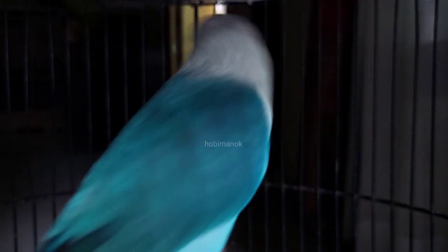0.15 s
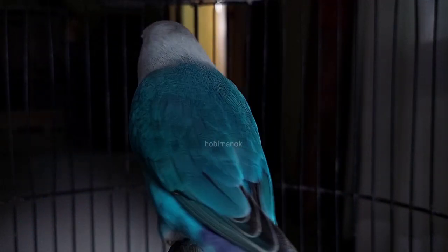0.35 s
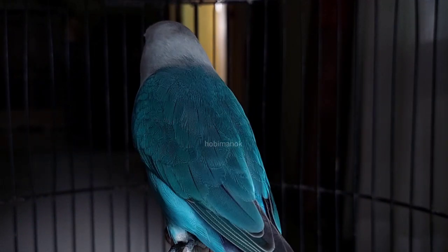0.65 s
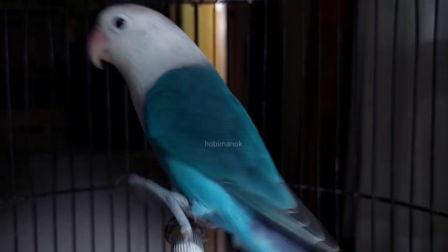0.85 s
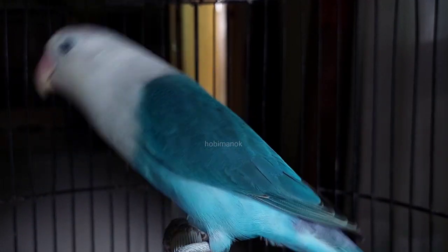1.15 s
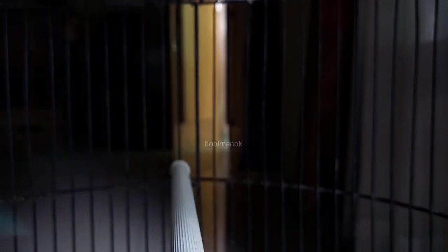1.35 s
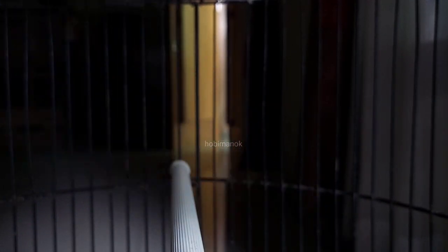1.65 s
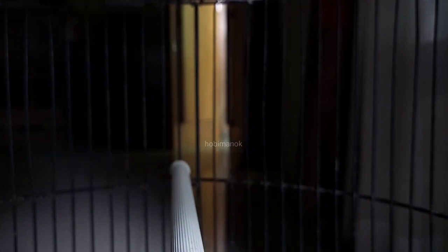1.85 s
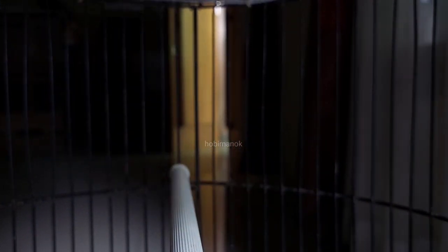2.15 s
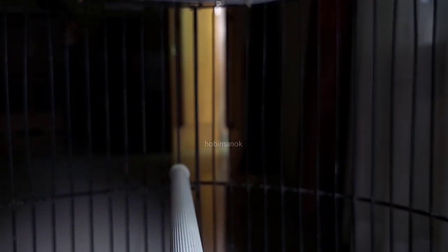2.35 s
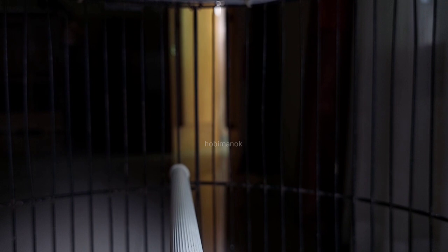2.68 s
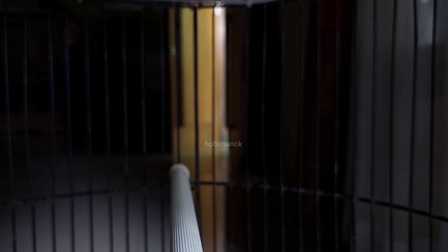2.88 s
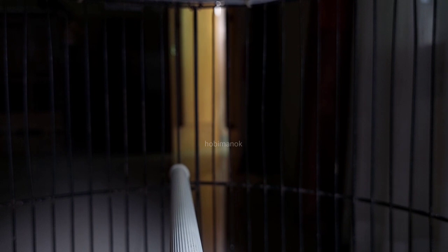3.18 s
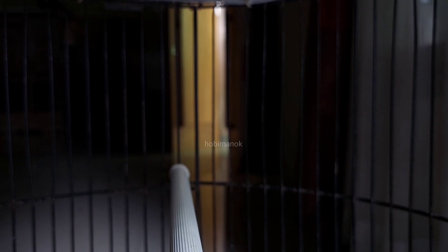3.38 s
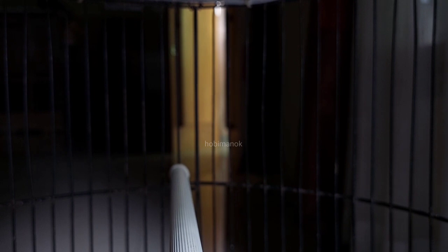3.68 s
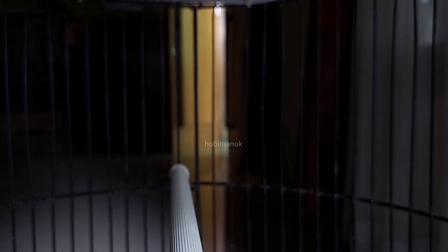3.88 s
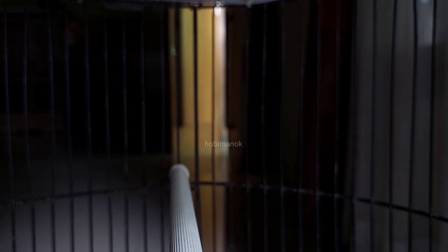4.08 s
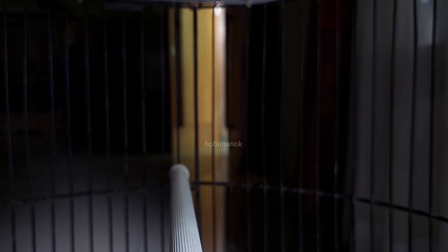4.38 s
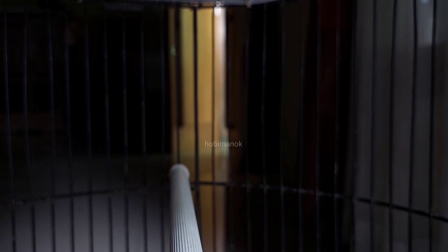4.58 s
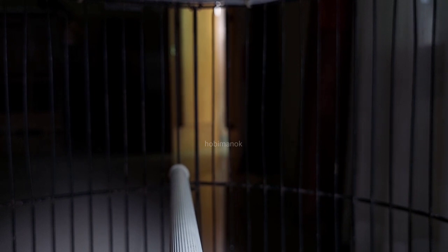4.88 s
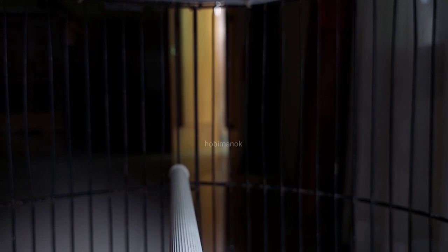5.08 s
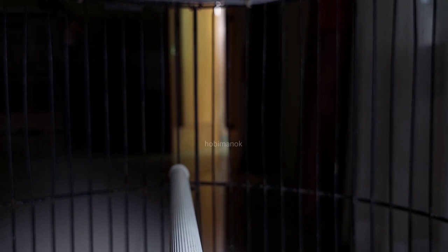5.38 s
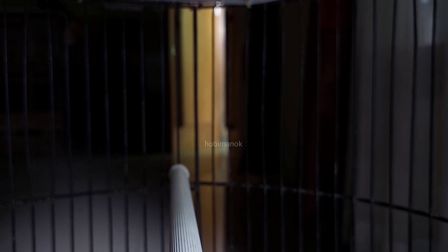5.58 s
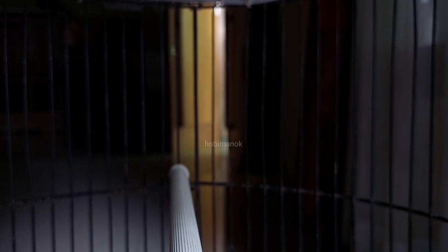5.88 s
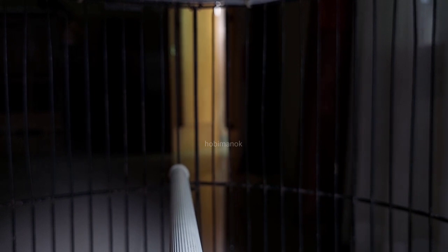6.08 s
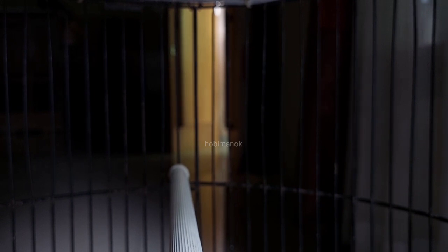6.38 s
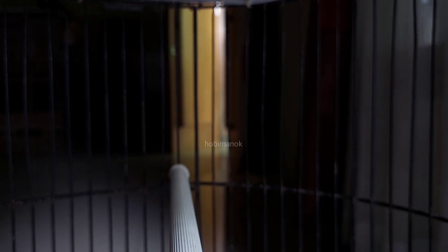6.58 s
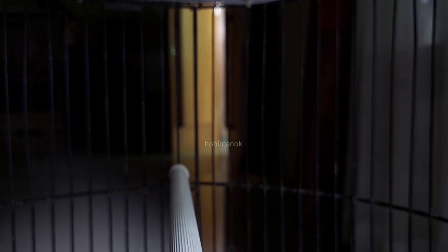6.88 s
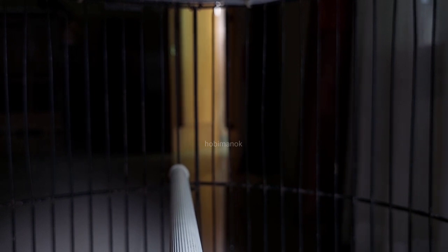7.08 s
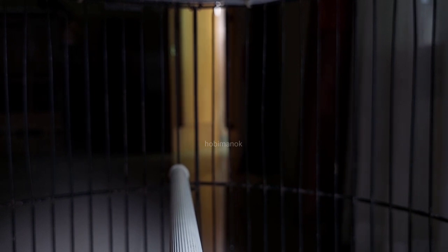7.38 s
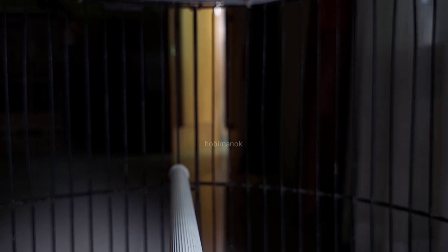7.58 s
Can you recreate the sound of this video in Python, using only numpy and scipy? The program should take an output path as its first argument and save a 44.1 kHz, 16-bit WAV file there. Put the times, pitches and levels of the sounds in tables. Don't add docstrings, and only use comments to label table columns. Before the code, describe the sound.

A small parrot very close to the microphone, mostly on the left, gives about a dozen short squeaky chirps. It pauses, wings flutter briefly, and one harsh chip sounds around two and a half seconds. Distant birds whistle and chip with hard yard echoes and claws tick the cage wires. From four and a half seconds it chatters loudly, about ten notes a second, through to the end, with breath puffs hitting the microphone and faint street rumble below.

```python
import sys
import numpy as np
from scipy import signal
from scipy.fft import rfft, irfft, next_fast_len
from scipy.io import wavfile
from scipy.ndimage import uniform_filter1d, map_coordinates

SR = 44100
rng = np.random.default_rng(int(sys.argv[2]) if len(sys.argv) > 2 else 0)


def how_loud(loudness_db):
    steps = np.asarray(loudness_db, float) / 20
    return 10 ** steps


def to_wav(sig):
    pcm = np.clip(np.atleast_2d(sig), -1, 1) * 32767
    pcm = np.round(pcm).astype(np.int16)
    wavfile.write(sys.argv[1], SR, pcm.T)


N = 341334

# t/s, street level/dB, flock level/dB
AIR = [(0, -64, -43), (1.3, -63, -39.5), (1.5, -51.5, -40), (1.8, -69, -56), (2.15, -55, -65.5),
       (2.431, -57.5, -45.5), (2.62, -58, -60), (2.7, -81, -60), (3.049, -80, -47.5), (3.401, -75, -46.5),
       (3.683, -77, -60), (3.692, -67, -48), (3.95, -66, -75), (4.41, -55.5, -76.5), (4.6, -66, -53.5),
       (7.74, -62, -51)]
# f/Hz, level/dB per Hz
RUMBLE = [(20, -47), (60, 7.5), (120, 6.5), (300, -28.5)]
FLOCK = [(1600, -46.5), (2340, -1.5), (4600, 2), (7600, -11), (12300, -8.5), (13800, -53)]
RUSTLE_EARLY = [(120, -9), (250, -4), (307, -0.5), (400, -6.5), (700, -4.5), (1000, -12.5), (1800, -16),
                (3200, -35.5)]
RUSTLE_LATE = [(200, -3.5), (415, 0), (635, 1.5), (950, -5), (1720, -7.5), (2100, -19.5), (2540, -7.5),
               (3200, -27.5)]
TRAY = [(200, -46), (285, -10), (307, 0.5), (330, -1.5), (450, -46.5)]
INSECT = [(13200, -68.0), (13380, 5.5), (13480, 5.0), (13700, -59.5)]
# peak t/s, peak level/dB, rise/s, fall/(dB/s)
STIRS = [
    (1.5, -45.5, 0.054, 67),
    (2.438, -32.5, 0.021, 193),
    (2.583, -59, 0.069, 260),
    (2.65, -58, 0.031, 48),
    (3.695, -48.5, 0.0097, 37),
    (4.174, -51.5, 0.0034, 150),
    (4.199, -63.5, 0.034, 41),
    (4.32, -58, 0.11, 35),
    (4.43, -75, 0.1, 124),
]
LITTER_DB = -9.5
TRAY_DB, TRAY_FOLLOWS = -30, 0.58
CUT_S = 3.684

# t/s, peak level/dB
TICKS = [
    (3.686, -63),
    (3.7206, -61),
    (4.0293, -45),
    (4.111, -47),
]
# f/Hz, level/dB
WIRE = [(3000, -18), (12000, 6), (15000, -18)]

# f/Hz, t60/s
YARD_T60 = [(2500, 0.65), (5000, 0.48), (9000, 0.65), (13000, 0.51), (15000, 1)]
# t/s, length/s, start f/Hz, end f/Hz, level/dB
GLIDES = [(1.644, 0.11, 5680, 2710, -41.5), (1.7, 0.12, 5460, 2546, -40), (1.833, 0.19, 7410, 2670, -41.5),
          (1.938, .13, 4740, 2194, -43), (2.078, .05, 7700, 7130, -60), (2.138, 0.064, 5950, 4250, -50),
          (2.157, 0.075, 3420, 2320, -52.5), (2.317, 0.091, 5200, 2400, -48.5),
          (2.928, .085, 4280, 2280, -65), (3.112, .066, 5240, 3910, -41.5),
          (3.246, 0.169, 4780, 4796, -45.5), (3.876, 0.32, 2920, 4540, -61), (3.903, 0.17, 3210, 3620, -64),
          (4.172, 0.35, 2244, 4490, -53.5)]
GLIDE_LIFT_DB, RISING_DB = -24, 3
# t/s, f/Hz, level/dB, overtone lift/dB
CHIPS = [(2.17, 2542, -53, 36), (2.263, 2540, -50, 43), (2.354, 2420, -59, 7.5), (2.834, 2280, -41, 2),
         (2.915, 2280, -43, -3), (3.07, 5240, -48, -23.5), (3.072, 6080, -47, -33), (3.085, 3020, -44, -4),
         (3.332, 3135, -45, 6), (3.15, 5120, -38.5, 14), (3.7, 2540, -47, -25), (3.74, 2510, -49, -21),
         (4.03, 2890, -63, -6), (4.185, 1850, -62, -11), (4.302, 2500, -56.5, -25)]
CHIP_S, CHIP_SAG = 0.028, 0.97

# f/Hz, level/dB
REGISTER = [(1800, 4), (2500, 10), (3200, -2), (3550, -7), (3900, -9), (4300, -20), (4700, -20.5),
            (5200, -8)]
# f/Hz, level/dB
BEAK = [(7500, -12.5), (9000, -20.5), (11000, -12), (13000, -19), (15500, -28), (17000, -80.5)]
# f/Hz, level/dB
HISS = [(600, -26.5), (1800, -17), (3000, -6), (5000, -2.5), (9000, -3.5), (12000, -0.5), (15500, -43)]
# f/Hz, level/dB
CLICK = [(1200, -35), (2500, -1.5), (5000, 10), (9000, -8), (13000, -9.5), (16000, -29.5)]
# its f/Hz, level/dB
HALF = [(1500, -52.5), (1950, -25), (2450, -28), (3000, -45.5)]
# f/Hz, level/dB
LEAN = [(2400, -10), (3600, -12), (5000, -3.5), (15000, -4)]
# from t/s, left lead/samples, left over right/dB, overtone lift/dB, roughness factor
PERCH = [(0, 4.3, 12, 13, 1.1), (.1, 3, 15.5, 6, 1.23), (.2, 4.1, 16.5, 7.5, 0.95),
         (.33, 2.3, 12.5, -1.5, 1.14), (.74, 1.75, 13, 4.5, 0.54), (1, 0.43, 17.5, 5, 0.9),
         (1.3, 0.74, 19.5, 4.5, 1.22), (1.4, .97, 20.5, 2, 1.34), (2, 15.2, 17.5, -16, 1.31),
         (2.48, 17.9, 22, 9.5, 0.49), (4, 10.16, 12.5, 7.5, 0.81), (4.6, 10.06, 15.5, 2, 0.79),
         (6.7, 9.9, 15, 9, 1.03), (6.8, 9.8, 16.5, 14, 1.07), (7.15, 9.3, 15.5, 10.5, 1.2),
         (7.25, 10.705, 15.5, 15, 1.15)]
SHIMMER_DB, FLUTTER_DB = 1.1, 2.5
WANDER, WANDER_PER_S = .007, 90
KICK_UP, KICK_DOWN = 0.087, -0.187
# f/Hz, level/dB per Hz
PUFF = [(25, -20), (65, 2.5), (150, -8), (400, -16.5), (1200, -30), (3000, -81)]
# break t/s, rms level/dB
PUFFS = [(0.041, -57), (0.147, -71.5), (0.268, -80), (0.374, -73), (0.502, -74), (0.661, -79),
         (0.778, -72.5), (0.906, -67), (1.035, -58), (1.172, -49.5), (1.336, -54), (1.477, -64),
         (2.49, -44), (2.557, -34.5), (4.452, -38.5), (4.555, -39), (4.649, -48), (4.747, -64),
         (4.847, -49), (4.95, -51.5), (5.052, -46.5), (5.157, -49.5), (5.256, -49.5), (5.367, -47.5),
         (5.466, -44.5), (5.576, -51), (5.678, -43), (5.792, -52.5), (5.898, -47.5), (6.011, -54),
         (6.117, -49.5), (6.224, -51.5), (6.33, -51.5), (6.437, -48.5), (6.544, -51.5), (6.653, -65),
         (6.766, -41), (6.874, -33), (6.987, -33), (7.1, -33.5), (7.2, -35), (7.301, -33.5), (7.403, -34.5),
         (7.506, -32), (7.607, -35), (7.709, -35.5)]
PUFF_MAX_S = 0.051

# break t/s, lead-in/s, low register f/Hz, high register f/Hz, level/dB
FLIPS = [(4.749, 0.027, 2918, 5210, -3.5), (4.952, 0.03, 2690, 5165, -2.5), (5.159, 0.028, 2546, 4986, -2),
         (5.369, .032, 2543, 5026, -2), (5.578, .031, 2534, 4980, -2.5), (5.794, 0.033, 2530, 5027, -2.5),
         (6.013, .033, 2556, 4990, -2), (6.226, 0.028, 2826, 5150, -3), (6.439, 0.026, 2742, 5100, -3),
         (6.655, 0.03, 2603, 4970, -3)]
STEPS = [
    (4.653, 0.031, 3887, 4193, -3.5),
    (4.851, 0.031, 3724, 4120, -4),
    (6.121, 0.029, 3613, 4020, -5),
    (6.333, 0.033, 3730, 4130, -5),
    (6.5465, 0.029, 3693, 3990, -5.5),
]
HOOKS = [
    (5.054, 0.026, 3600, 4040, -3.5),
    (5.258, 0.021, 3493, 3980, -3.5),
    (5.468, 0.023, 3550, 4044, -3),
    (5.68, .027, 3550, 4030, -3.5),
    (5.9, 0.029, 3573, 4035, -4),
]
GAPS = [
    (.504, 0.03, 3235, 3990, -7.5),
    (.663, .036, 3012, 3930, -6),
]
PEAKS_UP = [
    (.78, .016, 2017, 4560, -10.5),
    (.908, .016, 2056, 4544, -10.5),
]
LONG_PEAKS = [
    (1.037, .017, 1970, 4310, -9),
    (1.174, 0.016, 1977, 4287, -6.5),
]
HIGH_PEAKS, THIN_PEAKS = [(1.336, .016, 1992, 5214, -4.5)], [(1.478, 0.01, 2093, 5190, -7)]
FIRST_FLIPS = [
    (.043, 0.028, 2420, 4790, -9),
    (.27, 0.03, 2528, 4920, -5),
]
FALLS = [
    (4.454, 0.037, 4393, 5390, -3.5),
    (4.557, .041, 4100, 5560, -4.5),
]
LATE_FALLS = [
    (6.876, .038, 3520, 4760, -3),
    (6.989, .037, 3423, 4770, -3),
    (7.102, .036, 3270, 4700, -3.5),
]
NUDGES, FIRST_HOOKS = [(.151, 0.034, 3488, 3840, -12)], [(0.377, 0.033, 3510, 3980, -8.5)]
SWELLS = [(6.769, 0.037, 3584, 4836, -3)]
# share of lead-in still to go, factor on low f, level/dB
CREEP = [(1.05, .75, -32), (.88, .88, -19), (.62, 1.0, -13), (.3, 1.0, -5.5), (.1, .97, -2.5), (0, .95, -3)]
GRUNT = [(1.1, .5, -30), (.95, .52, -25), (.8, .58, -21), (.74, 1.01, -16), (.45, .99, -8),
         (.15, 1.0, -2.5)]
GROWL = [(1, .45, -25), (.68, .57, -15), (.6, 1.02, -12), (.4, 1.0, -6), (.15, .99, -2)]
INTO_STEP, INTO_HOOK = (0, 1.02, -2), (0, 1.17, -3)
CLIMB = [(1, .56, -30), (.74, .64, -13.5), (.64, 1.13, -11), (.17, 1.01, -6.5), (0, 1.3, -6.5)]
RUN_UP = [(1, .9, -21), (0.639, .97, -8), (0.399, 1.08, 0), (0.039, 1.5, -3)]
DRONE = [(0.97, 0.88, -15), (.75, 1.0, -12), (.3, 1.01, -9.5), (0.3, 1, -3), (0.063, 1.5, -8)]
SPRING = [(1, .95, -28), (.55, 1.0, -17), (.25, 1.15, -3), (.05, 1.3, -4)]
SLIDE = [(1, .97, -22), (.9, 1.0, -5), (.64, .97, -2), (.45, .84, -4.5), (.28, .81, -4.5), (.15, .755, -2),
         (.04, .72, -1)]
PLUNGE = [(1, 1.0, -20), (.87, 1.01, -8), (.5, .89, -3), (.22, .78, -1), (.12, .72, -3), (.04, .69, -5)]
SURGE = [(1, .93, -24), (.88, 1.03, -11), (.65, .9, -10), (.45, .84, -9), (.3, .77, -2), (.15, .7, 0),
         (.05, .67, -8)]
# t after break/s, factor on high f, level/dB
WHISTLE = [(.002, 1, -1), (.006, .99, -1), (.012, 1, -3.5), (.016, 1, -10), (.022, .99, -26)]
SETTLE = [(.002, 1.05, -3), (.006, .99, -2), (.012, 1.01, -4), (.017, 1.02, -9), (.023, 1.0, -24)]
BUMP = [(.003, 1.15, -7), (.0055, 1.1, 0), (.009, 1.0, -2), (.016, 1.0, -6), (.023, .97, -22)]
FLICK = [(.003, 1.5, -8), (.006, 1.22, -5), (.009, 1.02, -2), (.012, .98, -3), (.018, 1, -6),
         (.024, 1.02, -15), (.028, 1, -35)]
FAINT_FLICK = [(.003, 1.48, -15), (.006, 1.2, -10), (.008, 1.04, 0), (.012, .99, -3), (.02, 1, -8),
               (.027, .99, -30)]
STALL = [(.001, 1.5, -28), (.008, 1.57, -20), (.0105, 1.12, -24), (.012, 1.08, 0), (.017, 1.01, -4),
         (.024, .98, -11), (.03, .97, -30)]
DIVE = [(.001, 1.02, 2), (0.013, .79, -7.5), (0.017, .71, -1), (.026, .69, 1), (0.034, .69, -25)]
LONG_DIVE = [(.001, 1.02, 3.5), (.012, .88, -3.5), (.017, .77, -2.5), (.03, .72, -2), (.038, 0.716, -13)]
HIGH_DIVE = [(.003, 1.0, -2), (.008, .9, -1), (.016, .78, 0), (.022, .745, -3), (.034, .73, -9),
             (.043, .74, -20)]
SAG = [(.001, 1.0, 0), (.006, .97, -3), (.012, .94, -7), (.02, .93, -24)]
LANDING = [(.001, .98, -0.5), (.006, .97, -4.5), (0.014, 1.01, -6.5), (0.019, 0.98, -31)]
TOUCHDOWN = [(.002, .97, 0), (.006, .99, -1), (.010, 1.01, -4), (.014, 1.0, -12), (.02, 1.0, -27)]
# t/s, f/Hz, level/dB
CHIP_LEAD = [(2.471, 2280, -28.5), (2.474, 2365, -11.5), (2.484, 2943, -6.5), (2.488, 3490, -7),
             (2.491, 4470, -2), (2.497, 2360, -14.5)]
CHIP_HOLD = [(2.495, 2240, -7), (2.499, 3078, -15), (2.502, 2112, -4.5), (2.522, 2183, -6),
             (2.559, 2190, -8.5)]
CHIP_TWIST = [(2.559, 4880, -3.5), (2.562, 5990, -5), (2.567, 6350, -7), (2.575, 5880, -8.5),
              (2.578, 4165, -8), (2.581, 4000, -9), (2.584, 2770, -29), (2.585, 3820, -6.5),
              (2.608, 4776, -6), (2.617, 4760, -22)]
# t after start/s, f/Hz, level/dB
REFRAIN = [(0, 2530, -27), (.002, 2945, -11.5), (.005, 3478, -8), (.008, 2970, -9.5), (0.011, 2218, -9),
           (.012, 4510, -11.5), (.015, 3450, -10.5), (.026, 3461, -10), (0.035, 3427, -16)]
# start t/s, pitch factor, level/dB
REPEATS = [
    (7.1911, 0.99, 2),
    (7.291, 0.97, 2.5),
    (7.393, 0.99, 2),
    (7.496, 0.98, 3),
    (7.597, 0.98, 2),
    (7.699, 0.98, 2),
]
REFRAIN_BREAK_S = 0.0137

# f/Hz, level/dB
HOUSING = [(7600, -1.0), (8900, -4), (10200, -3.0), (13600, 0.0),
           (14300, -6.5), (15300, 0.0), (16200, -11.5), (16700, -59.5)]


def unit(x):
    return x / np.sqrt(np.mean(x ** 2) + 1e-20)


def along(points, hz):
    f, v = np.transpose(points)
    return np.interp(np.log(hz + 1), np.log(f + 1), v)


def wobble(size, rate):
    knots = rng.standard_normal(int(size * rate / SR) + 4)
    return map_coordinates(knots, [np.arange(size) * rate / SR])


def filtered(x, response):
    m = next_fast_len(x.shape[-1] + 8192)
    spectrum = rfft(x, m) * response(np.fft.rfftfreq(m, 1 / SR))
    return irfft(spectrum, m)[..., :x.shape[-1]]


def noise(spectrum, channels=2):
    white = rng.standard_normal((channels, N))
    return unit(filtered(white, lambda hz: how_loud(along(spectrum, hz))))


def patchy(x, depth_db):
    z = signal.stft(x, nperseg=512)[2]
    field = rng.standard_normal(z.shape[1:])
    field = uniform_filter1d(field, size=3, axis=0)
    field = uniform_filter1d(field, size=16, axis=1)
    return unit(signal.istft(z * how_loud(depth_db * unit(field)), nperseg=512)[1][:, :N])


def add(track, s, sound):
    part = track[..., round(s * SR):][..., :sound.shape[-1]]
    part += sound[..., :part.shape[-1]]


def background():
    s, *levels = np.transpose(AIR)
    t = np.arange(N) / SR
    rumble_db, flock_db = (np.interp(t, s, db) for db in levels)

    stir = np.zeros(N)
    for at, db, rise_s, fall in STIRS:
        fallen_db = fall * (t - at)
        rise = np.clip(1 + (t - at) / rise_s, 0, 1) ** 2
        stir += how_loud(db - fallen_db) * rise * how_loud(np.minimum(fallen_db, 0))

    rumble = how_loud(rumble_db + 0.86 * wobble(N, 14.0) + [[2.5], [0]]) * noise(RUMBLE)

    early = patchy(noise(RUSTLE_EARLY), depth_db=1.5)
    late = patchy(noise(RUSTLE_LATE), depth_db=2.5)
    rustle_gain = (stir + how_loud(rumble_db + LITTER_DB)) * how_loud(1.4 * wobble(N, 35) + [[-2.5], [4]])
    rustle = rustle_gain * np.where(t < CUT_S, early, late)

    tray_gain = stir ** TRAY_FOLLOWS * how_loud(TRAY_DB + 1.8 * wobble(N, 68) + [[-2.5], [2.5]])
    tray = tray_gain * (t < CUT_S) * noise(TRAY, channels=1)

    flock = how_loud(flock_db + 4.0 * wobble(N, 12) + [[1.5], [-4]]) * patchy(noise(FLOCK), depth_db=6)
    insect = how_loud(-64.5 + 2.5 * wobble(N, 4) + [[0], [-9]]) * noise(INSECT)
    return rumble + rustle + tray + flock + insect


def cage():
    out, t = np.zeros((2, N)), np.arange(1500) / SR
    for s, db in TICKS:
        add(out, s, how_loud(db - 8.0 - 60 * t / 0.071) * rng.standard_normal((2, len(t))))
    return filtered(out, lambda hz: how_loud(along(WIRE, hz)))


def yard_echoes(count, swell_s):
    hz, t, z = signal.stft(rng.standard_normal((count, 2, 3 * SR // 4)), SR, nperseg=256)
    decay = how_loud(-60 * t / along(YARD_T60, hz)[:, None])
    tail = signal.istft(z * decay * (1 - np.exp(-t / swell_s)), SR, nperseg=256)[1]
    return tail / np.linalg.norm(tail[0, 0])


def syrinx(hz, lift_db, waver, shimmer_db, rough, half):
    size = len(hz)
    phase = 2 * np.pi * np.cumsum(hz * (1 + waver * wobble(size, 500))) / SR
    second = how_loud(along(REGISTER, hz) + lift_db)
    tone = (np.sin(phase) + second * np.sin(2 * phase + 1.0)) / np.hypot(1, second)
    tone += half * np.sin(phase / 2 + 1.3 * wobble(size, 400))
    for k in range(3, 8):
        flutter_db = FLUTTER_DB * rough * wobble(size, 500)
        partial_db = along(BEAK, k * hz) + 0.26 * lift_db - 0.22 * (k - 3.0) + flutter_db
        jitter = 0.12 * k * rough * wobble(size, 1500)
        tone += how_loud(partial_db) * np.sin(k * phase + jitter)
    rasp = 1 + 0.13 * rough * wobble(size, 2400)
    return rasp * tone * how_loud(shimmer_db * wobble(size, 612.2))


def far_birds():
    out, echoes = np.zeros((2, N)), yard_echoes(count=4, swell_s=0.0017)
    calls = [(*glide, GLIDE_LIFT_DB) for glide in GLIDES]
    calls += [(s, CHIP_S, hz, CHIP_SAG * hz, db, lift_db) for s, hz, db, lift_db in CHIPS]
    for i, (s, length_s, from_hz, to_hz, db, lift_db) in enumerate(calls):
        u = np.linspace(0, 1, round(length_s * SR))
        bend = 1.25 if to_hz < from_hz else 3.4
        pitch_hz = to_hz + (from_hz - to_hz) * (1 - u) ** bend
        tone = syrinx(pitch_hz, lift_db, waver=0.0023, shimmer_db=5.5, rough=0.98, half=0)
        call = how_loud(db) * np.sin(np.pi * u ** 0.96) * tone
        direct_db = np.array([[-7], [-9]]) + RISING_DB * (to_hz > from_hz)
        add(out, s, how_loud(direct_db) * call)
        add(out, s, how_loud([[0], [-3.5]]) * signal.fftconvolve(call[None], echoes[i % 4], axes=1))
    t = np.arange(N) / SR
    return out * np.where(t < CUT_S, np.clip((3.72 - t) / 0.083, 0, 1), 1)


def notes():
    kinds = [(FLIPS, CREEP, WHISTLE), (STEPS, GRUNT + [INTO_STEP], SETTLE),
             (HOOKS, GRUNT + [INTO_HOOK], FLICK), (NUDGES, GROWL + [INTO_STEP], BUMP),
             (FIRST_HOOKS, GROWL + [INTO_HOOK], FAINT_FLICK), (SWELLS, SURGE, LANDING),
             (GAPS, CLIMB, STALL), (PEAKS_UP, RUN_UP, DIVE), (LONG_PEAKS, RUN_UP, LONG_DIVE),
             (HIGH_PEAKS, DRONE, HIGH_DIVE), (THIN_PEAKS, SPRING, HIGH_DIVE), (FIRST_FLIPS, CREEP, SAG),
             (FALLS, SLIDE, TOUCHDOWN), (LATE_FALLS, PLUNGE, LANDING)]
    sung = []
    for rows, before, after in kinds:
        kick = KICK_DOWN if rows is STEPS else KICK_UP
        for at, lead_s, low_hz, high_hz, db in rows:
            points = [(at - share * lead_s, k * low_hz, db + d) for share, k, d in before]
            points += [(at + s, k * high_hz, db + d) for s, k, d in after]
            sung.append((at, points, kick))
    for start, factor, lift_db in REPEATS:
        points = [(start + s, hz * factor, db + lift_db) for s, hz, db in REFRAIN]
        sung.append((start + REFRAIN_BREAK_S, points, KICK_UP))
    sung.append((CHIP_LEAD[-2][0], CHIP_LEAD, KICK_UP))
    sung.append((CHIP_TWIST[0][0], CHIP_HOLD + CHIP_TWIST, KICK_UP))
    return sorted(sung)


def parrot():
    out, echoes = np.zeros((2, N)), yard_echoes(count=6, swell_s=0.00092)
    snap = noise(CLICK, channels=1)[0]
    breath, air = noise(HISS), noise(PUFF) * how_loud([[0], [-16]])
    for i, ((catch_s, note, kick), (_, puff_db)) in enumerate(zip(notes(), PUFFS)):
        s, hz, db = np.transpose(note)
        length_s = s[-1] - s[0]
        t = s[0] + np.arange(round(length_s * SR)) / SR
        at = slice(round(s[0] * SR), round(s[0] * SR) + len(t))
        _, lead, pan_db, lift_db, rough = [perch for perch in PERCH if perch[0] <= s[0]][-1]

        catch = np.exp(-((t - catch_s) / 0.0013) ** 2)

        step = np.interp(t, s, np.arange(len(s)))
        bend = np.where(step > len(s) - 2, 3, np.where(step < 1, 2, 1.4))
        eased = step // 1 + 1 - (1 - step % 1) ** bend
        pitch_hz = uniform_filter1d(np.interp(eased, np.arange(len(s)), hz), size=40)
        pitch_hz = pitch_hz * (1 + kick * catch + WANDER * min(rough, 1.2) * wobble(len(t), WANDER_PER_S))

        edge = np.clip(np.minimum(t - s[0], s[-1] - t) / .002, 0, 1)
        size = uniform_filter1d(np.interp(t, s, how_loud(db)), size=30) * edge
        effort = size / size.max()
        half = how_loud(along(HALF, pitch_hz / 2)) * (rough > .5)
        tone = syrinx(pitch_hz, lift_db + 18 * (effort - 1), waver=0.014 * rough,
                      shimmer_db=SHIMMER_DB * rough ** 2, rough=rough, half=half)
        hiss = how_loud(-23.0 + 0.19 * lift_db) * breath[:, at]
        voice = size * ((1 - 0.96 * catch) * tone + hiss + how_loud(-6.0) * catch * snap[at])

        def right(f):
            return how_loud(-pan_db - along(LEAN, f)) * np.exp(-2j * np.pi * f * lead / SR)

        add(out, s[0], np.array([voice[0], filtered(voice[1], right)]))
        add(out, s[0], how_loud([[-17], [-21]]) * signal.fftconvolve(voice, echoes[i % 6], axes=1))

        progress = np.clip(1 - (s[-1] - t) / min(PUFF_MAX_S, length_s), 0, 1)
        blow = np.sin(np.pi * progress ** 0.66) ** 1.9
        add(out, s[0] + 0.0094, how_loud(puff_db - 2.0) * unit(blow * air[:, at]))
    return out


def scene():
    return background() + cage() + far_birds() + parrot()


def band_limit(x):
    return signal.sosfilt(signal.butter(12, 16620, fs=SR, output="sos"), x)


def record(dry):
    soft = dry / (1 + np.abs(dry / .97) ** 6) ** (1 / 6)
    dull = filtered(soft, lambda hz: how_loud(along(HOUSING, hz)))
    return band_limit(dull)


dry = scene()
out = record(dry)
to_wav(out)
```